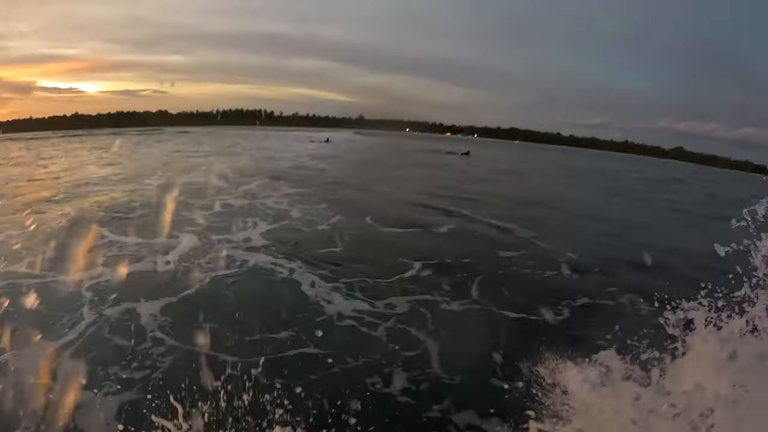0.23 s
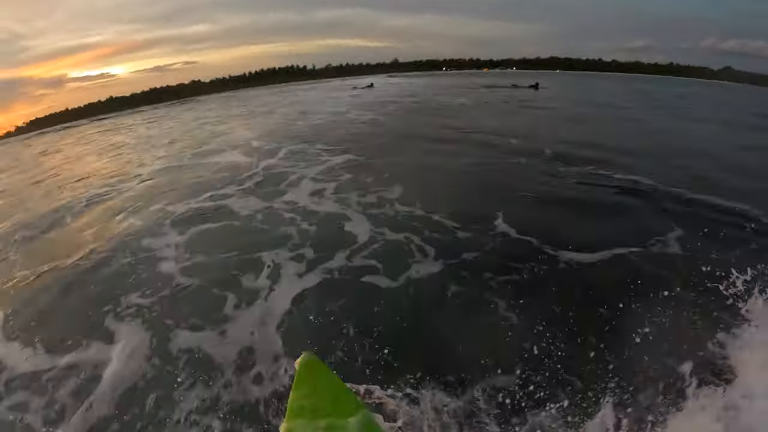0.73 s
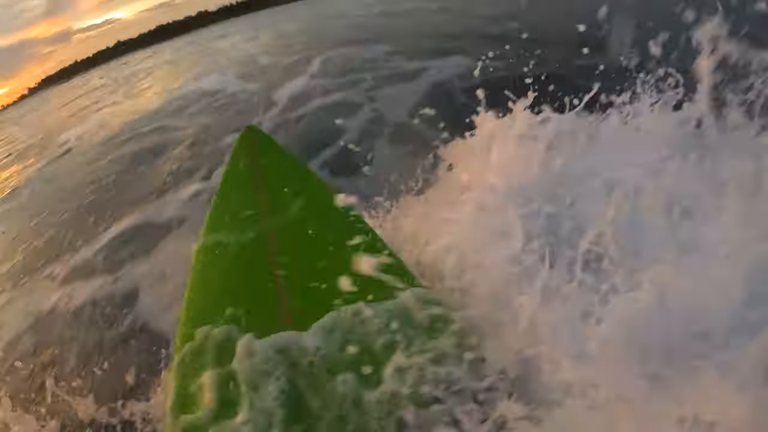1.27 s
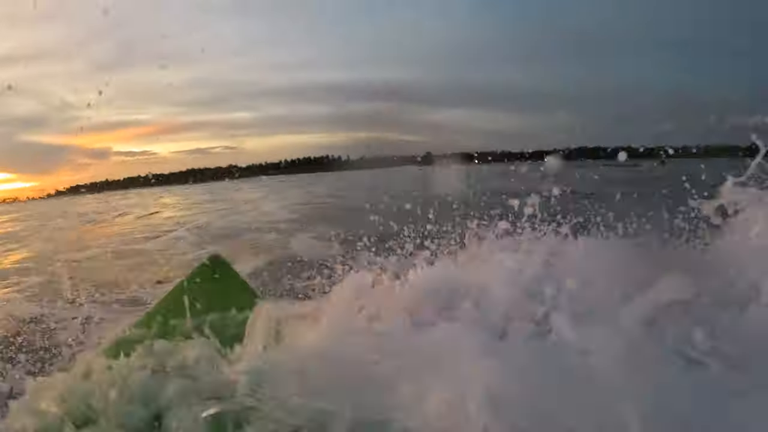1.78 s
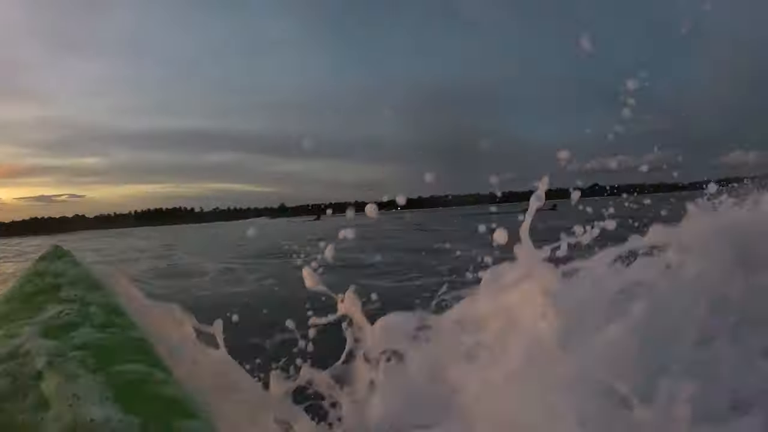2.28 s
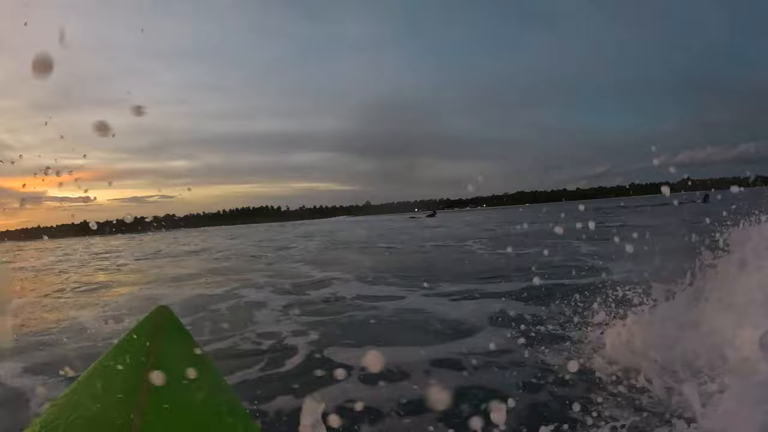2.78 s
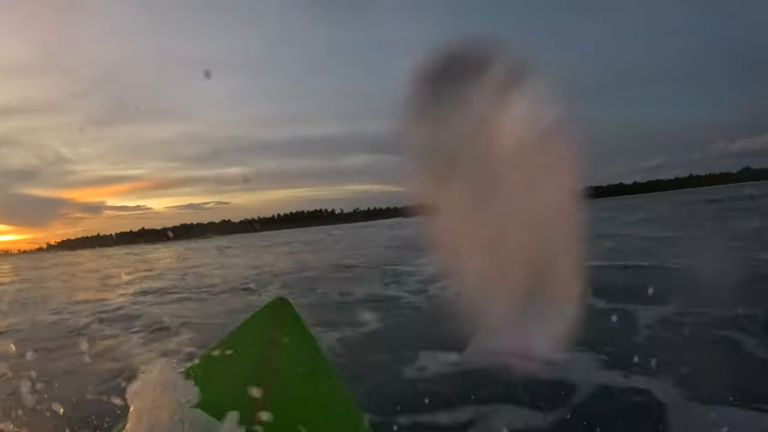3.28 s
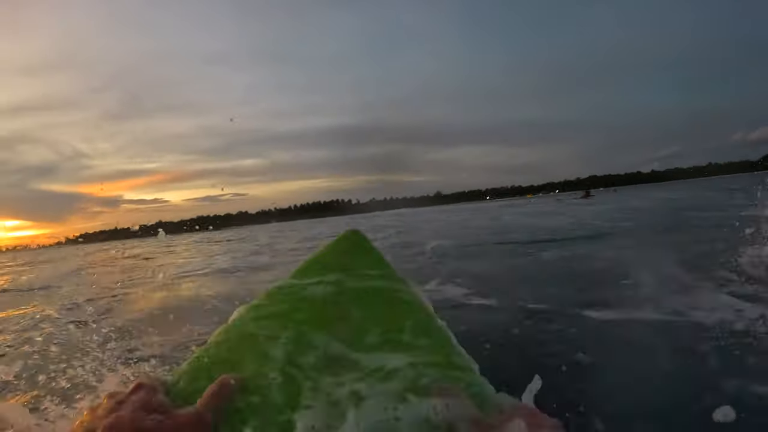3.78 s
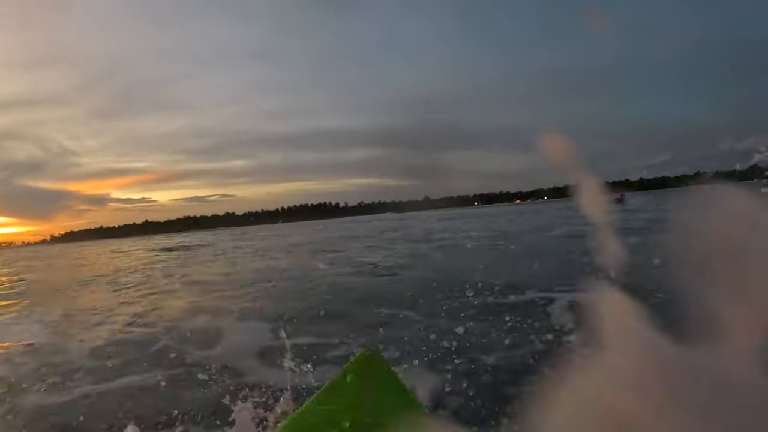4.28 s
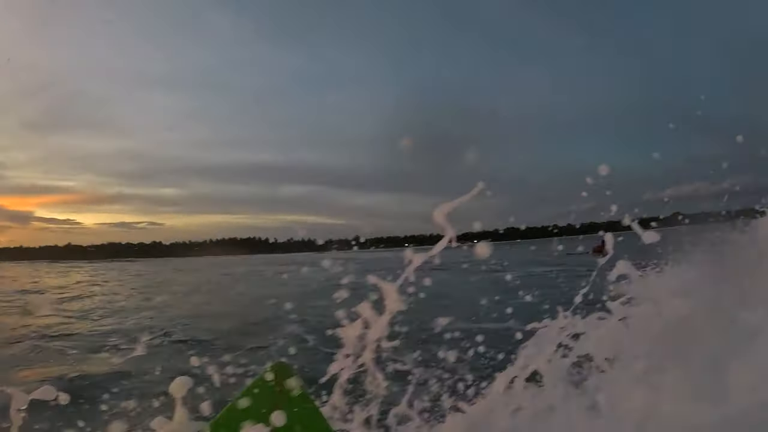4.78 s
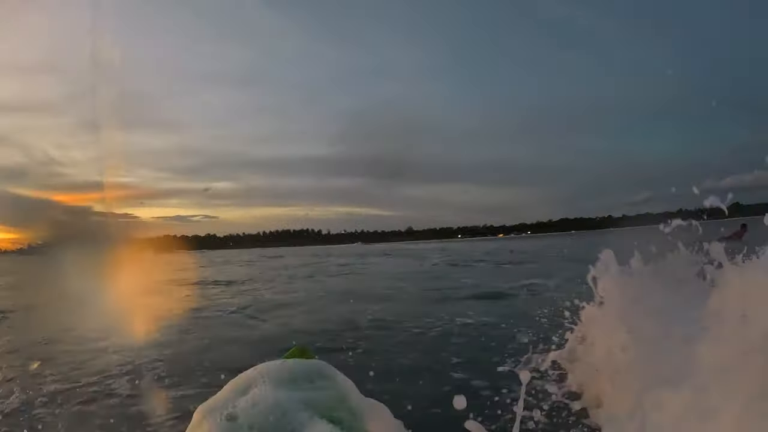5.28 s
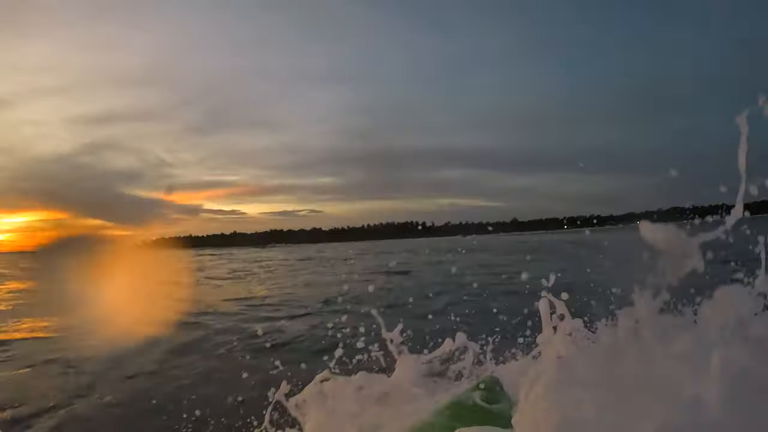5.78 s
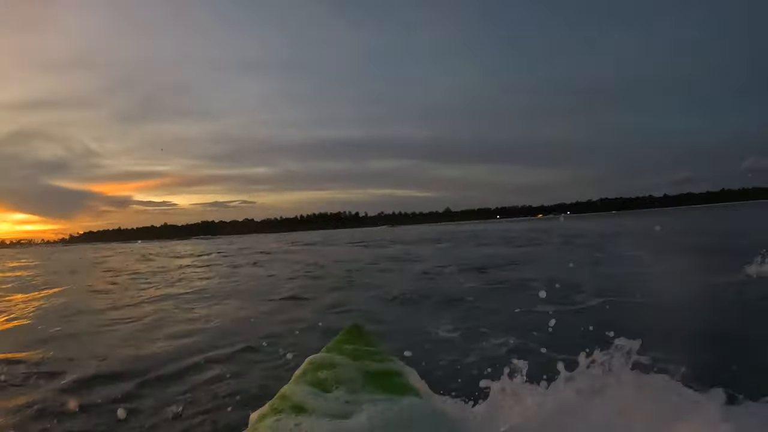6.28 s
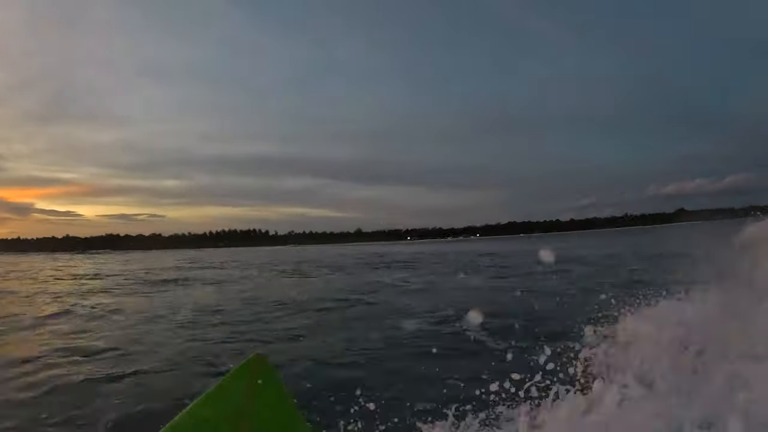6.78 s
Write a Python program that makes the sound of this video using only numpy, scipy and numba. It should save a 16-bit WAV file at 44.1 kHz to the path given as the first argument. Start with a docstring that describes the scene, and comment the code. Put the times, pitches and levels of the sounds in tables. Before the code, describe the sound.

Continuous muffled white-water roar beside a surfboard, hollow booming under the curling lip, a cluster of gulps and spray hiss, then hard drop clicks.

```python
"""Surfboard beside a breaking wave

White water roars and wind buffets a sealed housing on the board: noise with patchy bands.
Air trapped under the curling lip booms as a driven resonance; gulps are tones sinking in pitch.
Spray and single drops strike the housing and ring the small cavity before the microphone,
whose first two modes shift with the water film on it. A limiter and a treble cut end the chain."""
import sys
import numpy as np
from scipy import signal
from scipy.fft import rfft, irfft, next_fast_len
from scipy.io import wavfile
from numba import njit

SR = 44100
rng = np.random.default_rng(int(sys.argv[2]) if len(sys.argv) > 2 else 0)


def unload_wav(signal):
    """Save mono or channel-first audio to the path in sys.argv[1] as 16-bit WAV at rate SR, clipped to [-1, 1]."""
    wavfile.write(
        sys.argv[1],
        SR,
        np.round(np.clip(np.atleast_2d(signal).T, -1, 1) * 32767).astype(np.int16),
    )


N = 309582

# The open sea. Each row: time in seconds, then the levels of wind buffeting, low surge and roar in dB.
SEA = [(0, -33, -23.5, -21.5), (.25, -23.5, -30, -22.5), (.42, -20, -25, -22.5), (.75, -26, -21.5, -19.5),
       (1.1, -20.5, -21.5, -19.5), (1.45, -25, -20, -17.5), (1.7, -28, -20.5, -22),
       (1.95, -23.5, -20, -19.5), (2.35, -30, -23.5, -21.5), (2.8, -26, -19, -19), (3.7, -25.5, -21.5, -20),
       (4.7, -28, -20.5, -21), (5.1, -21, -21.5, -19), (5.35, -26, -24.5, -20.5), (5.6, -35, -19, -21),
       (6.0, -20, -18.5, -18.5), (6.35, -33, -23.5, -20.5), (7.02, -23, -20.5, -18)]


def amp(db):
    """Logarithmic level: decibels become a pressure ratio."""
    return 10 ** (np.asarray(db) / 20)


def rms_one(x):
    """Normalization: the root-mean-square value becomes 1."""
    return x / np.sqrt(np.mean(x ** 2) + 1e-30)


def in_time(rows):
    """Linear interpolation: each column after the time gets one value per sample."""
    s, *columns = np.transpose(rows)
    return [np.interp(np.arange(N) / SR, s, c) for c in columns]


def drift(rate):
    """Low-passed random fluctuation: spread 1, changing about rate times a second."""
    step = 40  # samples between the computed points
    r = np.exp(-2 * np.pi * rate * step / SR)
    noise = rng.standard_normal(N // step + 2002)
    slow = signal.lfilter([1], [1, -2 * r, r * r], noise)[2000:]  # past the filter's onset
    return np.interp(np.arange(N) / step, np.arange(len(slow)), rms_one(slow))


def churn(spectrum, patchy_db, rate):
    """Turbulent noise: overlapping half-octave bands fluctuate partly together, partly alone."""
    size = next_fast_len(N)
    octave = np.log2(np.maximum(np.arange(size // 2 + 1) * SR / size, 1))
    hz, level_db = np.transpose(spectrum)
    envelope_db = np.interp(octave, np.log2(hz), level_db, -200, -200)
    shaped = rfft(rng.standard_normal(size)) * amp(envelope_db)
    out = np.zeros(N)
    together = drift(rate)
    for centre in np.arange(3.5, 14, .5):  # log2 of Hz
        if hz[0] / 1.5 < 2 ** centre < hz[-1] * 1.5:
            share = np.clip(1 - 2 * abs(octave - centre), 0, 1)
            band = irfft(shaped * share, size)[:N]
            out += band * amp(patchy_db * (0.4 * together + 0.89 * drift(rate)))
    return rms_one(out)


@njit
def ring(clicks, turn, r):
    """Damped oscillator of movable pitch and damping: a unit click starts a sine of height 1."""
    out = np.zeros(len(clicks))
    for i in range(2, len(clicks)):
        kept = 2 * r[i] * np.cos(turn[i]) * out[i - 1] - r[i] ** 2 * out[i - 2]
        out[i] = kept + np.sin(turn[i]) * clicks[i - 1]
    return out


def mode(clicks, hz, t60):
    """Modal resonance: an excitation rings at hz and decays by 60 dB in t60 seconds."""
    turn = 2 * np.pi * hz / SR * np.ones(N)
    decay = amp(-60 / (t60 * SR)) * np.ones(N)
    return ring(clicks + 1e-18, turn, decay)  # the tiny offset avoids slow arithmetic near zero


def soften(x, cut_hz, kind="low", order=6):
    """Band limiting: frequencies outside the pass band are weakened."""
    return signal.sosfilt(signal.butter(order, cut_hz, kind, fs=SR, output="sos"), x)


def breaking_wave():
    """Turbulent radiation of white water: a low surge and a mid-frequency roar."""
    # Each row: frequency in Hz, spectral level in relative dB.
    surge_spectrum = [(50, -35.5), (90, -6), (150, 2), (200, -0.5), (280, -3), (400, -32)]
    roar_spectrum = [(150, -30.5), (230, -11), (300, 1.5), (450, -2.5), (700, -4.5), (850, -14.5),
                     (1100, -41.5)]
    _, surge_db, roar_db = in_time(SEA)
    surge = amp(surge_db) * churn(surge_spectrum, patchy_db=1.0, rate=4.4)
    roar = amp(roar_db) * churn(roar_spectrum, patchy_db=1.3, rate=12.0)
    return surge + roar


def water_near_board(deck_gust, spray_gust):
    """Turbulent noise close by: rush at the rail, wash over the deck and fizz of foam."""
    # Each row: time in seconds, then the levels of rush, steady wash and steady fizz in dB.
    foam = [(0, -38.5, -64, -61.5), (.23, -34, -59, -58.5), (.42, -24, -58, -52), (.62, -27.5, -62, -53),
            (.82, -24.5, -57, -57), (.9, -35.5, -54, -60), (1.1, -36, -51.5, -58.5),
            (1.27, -29, -51.5, -56), (1.5, -33, -56.5, -62.5), (2.3, -37, -51.5, -57),
            (2.7, -31.5, -50, -56.5), (3.0, -36.5, -53.5, -62.5), (3.28, -31, -47.5, -56.5),
            (3.56, -32, -54.5, -60), (3.74, -29.5, -55.5, -59.5), (4.15, -35.5, -55, -58.5),
            (4.35, -30.5, -63, -54), (4.58, -47, -60, -64), (4.75, -32.5, -57.5, -60),
            (5.5, -39, -57.5, -65), (6.0, -30, -49.5, -58.5), (6.55, -35, -55.5, -62.5),
            (7.02, -32, -49, -48)]
    # Each row: frequency in Hz, spectral level in relative dB.
    rush_spectrum = [(600, -20), (800, 1.5), (1000, -4.5), (1300, -15), (1700, -25), (2200, -37.5)]
    wash_spectrum = [(1100, -12), (1400, 4.5), (1900, 0.5), (2400, -5), (2900, -23), (3600, -31.5)]
    fizz_spectrum = [(2000, -8.5), (2700, -3.5), (3800, -8.5), (4200, -18), (5600, -24), (6100, -28),
                     (8000, -41.5), (9000, -64)]
    rush_db, wash_db, fizz_db = in_time(foam)
    wash_gain = amp(wash_db) + deck_gust
    fizz_gain = amp(fizz_db) + amp(-30.5) * spray_gust  # gusts of spray add to the fizz
    return (amp(rush_db) * churn(rush_spectrum, patchy_db=2.0, rate=20.0)
            + wash_gain * churn(wash_spectrum, patchy_db=3.5, rate=18.0)
            + fizz_gain * churn(fizz_spectrum, patchy_db=2.2, rate=7.2))


def hollow():
    """Noise-driven resonance: churning water excites the air trapped under the curling lip."""
    # Each row: time in seconds, mean pitch in Hz, mean level in dB.
    boom = [(0, 214.5, -34), (.8, 201.3, -29.5), (1.5, 187, -27.5), (1.9, 245, -27), (2.9, 200.5, -23.5),
            (3.6, 278, -22), (4.2, 251.4, -24), (5.0, 221.4, -31), (5.7, 210.4, -21), (6.1, 215, -30),
            (6.5, 248.5, -22), (7.02, 214.5, -29.5)]
    wander_hz, swing_db, changes_per_s, t60_s = 11, 2.5, 3.0, .06
    hz, level_db = in_time(boom)
    hz = hz + wander_hz * drift(changes_per_s)
    level_db = level_db + swing_db * drift(changes_per_s)
    air = mode(rng.standard_normal(N), hz, t60_s)
    return amp(level_db) * rms_one(soften(air, cut_hz=452))


def gusts():
    """Exponential envelopes: each gust swells, holds and fades, adding to a calm mist."""
    # Gusts of fine spray. Each row: arrival in seconds, hold in seconds, strength in dB,
    # swell in dB per second, fade in dB per second, then beside the strength in dB:
    # second mode, upper modes and wash over the deck.
    gust_rows = [(1.228, 0.012, -47, 302, 149, -24.5, -34, -15),
                 (1.486, 0.01, -37.5, 404, 155, -23, -28, -22),
                 (1.722, 0.062, -47, 51.3, 100.5, -15, -22.5, -5),
                 (1.891, 0.015, -57, 198, 200, -20, -14, -16),
                 (1.972, 0.16, -23.5, 104.6, 108.5, -20, -36, -17),
                 (4.232, 0.16, -35.5, 245.5, 400, -25, -28.5, -21),
                 (4.458, 0.13, -39, 401.5, 500, -22, -26.5, -24.5),
                 (4.74, 0.14, -39, 194, 130, -24, -36.5, -20), (6.65, 0.1, -45.5, 151, 105, -20, -24, -22),
                 (6.832, 0.28, -36.5, 90.8, 100, -23, -31, -26)]
    calm_db = -70
    t = np.arange(N) / SR
    out = amp(calm_db + np.array([[0], [-25], [-30], [-20]]))  # overall, second, upper, deck
    for s, hold, level_db, swell, fade, *share_db in gust_rows:
        before = np.maximum(s - t, 0)
        after = np.maximum(t - s - hold, 0)
        strength = amp(level_db - swell * before - fade * after)
        out = out + strength * amp([0, *share_db])[:, None]
    return out


def spray(strength, second, upper):
    """Random impacts: a dense mist arrives in clumps, and each mode catches it differently."""
    # How well the mist drives each of the four modes, in dB.
    coupling_db = [-12, -14, -8.5, -25.5]
    # The mist reaches the first two modes only near their pitch.
    # Each row: lower edge in Hz, upper edge in Hz.
    near_bands = [(1300, 2400), (2600, 4800)]
    typical_per_s = 6000
    hit = rng.random(N) < typical_per_s * amp(1.8 * drift(12)) / SR
    sizes = hit * amp(0.5 * np.minimum(rng.exponential(1, N), 5))
    mist = rms_one(sizes * rng.standard_normal((4, N)))
    near = [soften(m, band, "band", order=2) for band, m in zip(near_bands, mist)]
    caught = np.array([*near, *mist[2:]])
    return np.array([strength, second, upper, upper]) * amp(coupling_db)[:, None] * caught


def drops():
    """Impulsive excitation: each drop is one blow on the housing, shared among the modes."""
    # Single drops. Each row: time in seconds, blow on the second mode in dB, then beside it
    # the blows on the first, third and fourth modes in dB.
    drop_rows = [(1.492, -47, 22, -18, -29), (1.507, -31, -6, -31, -26), (1.9692, -40, 12, -21, -40),
                 (2.4952, -44, 12, -25, -44), (2.6125, -36, -6, -3, -51), (2.8074, -44, -3, -23, -36),
                 (2.8519, -44, 0, -24, -37), (4.1733, -14.5, 1, -32, -21.5), (4.1932, -30.5, -8, -34, -41),
                 (4.3505, -37, -4, -43, -42), (4.374, -24, -11, -39.5, -44), (4.3983, -23.5, 9, -40, -26),
                 (4.4033, -41, 24, -18, -15), (4.4194, -53, 9, -15, -16), (4.4513, -44.5, 29, -20, -10),
                 (4.4786, -52, 24, -15, -10.5), (4.4962, -47, 12, -7, -18), (4.582, -23, 16.5, -33, -41),
                 (4.7093, -39.5, -2, -25, -47), (4.7624, -52, 13, -12, -27), (4.802, -43, 16, -30, -45),
                 (5.0404, -36, -8.5, -23, -31), (5.075, -35.5, 6.5, -34, -33),
                 (5.2117, -49.5, 24.5, -31, -49), (5.243, -47, 11, -40, -40), (5.3308, -48, 10, -34, -21),
                 (7.001, -29, -10, -33, -20)]
    s, second_db, first_db, third_db, fourth_db = np.transpose(drop_rows)
    beside_db = np.array([first_db, 0 * s, third_db, fourth_db])
    blows = np.zeros((4, N))
    blows[:, np.round(s * SR).astype(int)] = amp(second_db + beside_db)
    return blows


def cavity(first, second, third, fourth):
    """Modal superposition: four modes ring from their own blows, the second in antiphase."""
    # The water film tunes and damps the cavity. Each row: time in seconds, first mode in Hz,
    # its 60 dB decay time in seconds, second mode in Hz, its 60 dB decay time in seconds.
    film = [(0, 1650, .01, 3600, .008), (1.5, 1700, .011, 4200, .006), (1.75, 1700, .011, 4300, .008),
            (1.89, 1780, .009, 4500, .009), (2.0, 1830, .008, 4150, .009), (2.25, 1800, .008, 3950, .009),
            (2.5, 1750, .008, 4050, .008), (2.6, 1700, .008, 3600, .008), (2.8, 1700, .008, 4450, .005),
            (2.85, 1650, .008, 3550, .012), (4.15, 1630, .011, 3460, .016), (4.5, 1640, .012, 3470, .016),
            (4.58, 1610, .008, 3500, .008), (4.7, 1630, .011, 3480, .016), (6.6, 1610, .016, 3430, .022),
            (7.02, 1570, .018, 3340, .022)]
    first_hz, first_t60, second_hz, second_t60 = in_time(film)
    low_pair = mode(first, first_hz, first_t60) - mode(second, second_hz, second_t60)
    third_ring = mode(third, hz=5230, t60=0.0033)
    fourth_ring = mode(fourth, hz=7930, t60=0.0051)
    # a wet contact lasts a moment, which dulls the sound
    return (soften(low_pair, cut_hz=4740)
            + soften(third_ring, cut_hz=[4600, 6200], kind="band")
            + soften(fourth_ring, cut_hz=8500))


def wall_slaps(blows):
    """Heavily damped wall resonance: the housing itself slaps under each drop."""
    gain_db = 2  # beside the blow on the second mode
    return amp(gain_db) * soften(mode(blows, hz=2380, t60=0.0014), cut_hz=4000)


def gulps():
    """Gliding tones: air pockets gulp and gusts of wind thump, each sinking in pitch."""
    # Each row: start in seconds, length in seconds, starting pitch in Hz, peak before softening in dB.
    gulp_rows = [(1.43, 0.074, 244, -19.5), (1.53, 0.046, 165, -15.5), (1.701, 0.065, 42, -13.5),
                 (1.752, 0.046, 296, -9), (1.806, 0.038, 45.4, -17), (1.908, 0.051, 49.6, -17),
                 (1.905, .21, 290.6, -14.5), (2.30, 0.05, 163, -13)]
    sink_octaves_per_s = 3.1
    out = np.zeros(N)
    for s, length, from_hz, peak_db in gulp_rows:
        size, at = int(length * SR), int(s * SR)
        hz = from_hz * 2 ** (-sink_octaves_per_s * np.arange(size) / SR)
        turn = 2 * np.pi * np.cumsum(hz) / SR
        out[at:at + size] += amp(peak_db) * np.sqrt(np.hanning(size)) * np.sin(turn)
    return soften(out, cut_hz=590)


def wind():
    """Turbulent pressure: wind buffets the housing as low-frequency noise."""
    # Each row: frequency in Hz, spectral level in relative dB.
    wind_spectrum = [(15, -10.5), (30, -7), (60, -5), (90, -5.5), (130, -20.5)]
    wind_db, _, _ = in_time(SEA)
    return amp(wind_db) * churn(wind_spectrum, patchy_db=1.0, rate=4.0)


def scene():
    """Linear superposition: water, air, impacts and wind add at one microphone."""
    strength, second, upper, deck = gusts()
    blows = drops()
    water = breaking_wave() + water_near_board(deck, strength)
    impacts = cavity(*(spray(strength, second, upper) + blows)) + wall_slaps(blows[1])
    return (water + hollow() + impacts + gulps() + wind())[None]


def record(dry):
    """Dynamic compression: a limiter ducks after peaks; faint hiss joins and the top is cut."""
    limit_db, release_db_per_s, attack_s = -8, 148.5, 0.0018
    hiss_db, cutoff_hz = -100, 14700
    over_db = np.maximum(20 * np.log10(abs(dry[0]) + 1e-9) - limit_db, 0)
    ramp = release_db_per_s * np.arange(N) / SR
    held_db = np.maximum.accumulate(over_db + ramp) - ramp  # peaks released at a steady rate
    r = np.exp(-1 / (attack_s * SR))
    duck_db = signal.lfilter([1 - r], [1, -r], held_db)
    limited = dry * amp(-duck_db)
    limited = limited + amp(hiss_db) * rng.standard_normal(N)
    top = signal.cheby2(10, 60, cutoff_hz, fs=SR, output="sos")
    settled = signal.sosfilt_zi(top) * limited[0, 0]  # no filter onset at the start
    return signal.sosfilt(top, limited[0], zi=settled)[0][None]


dry = scene()
out = record(dry)
unload_wav(out)
```